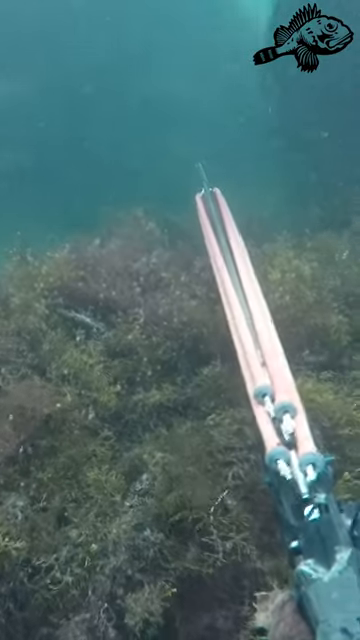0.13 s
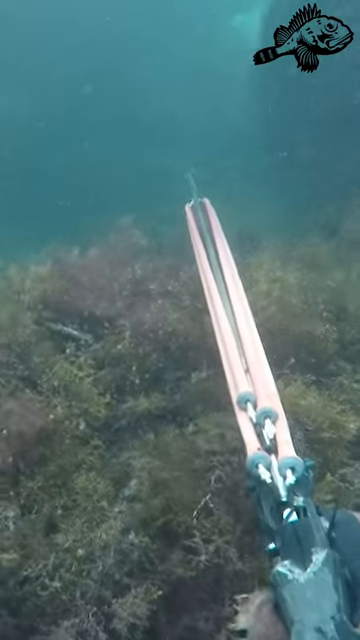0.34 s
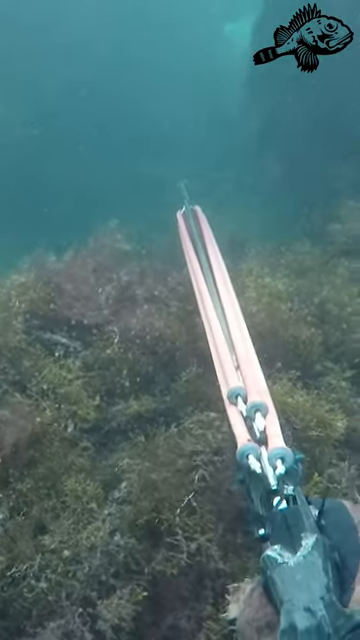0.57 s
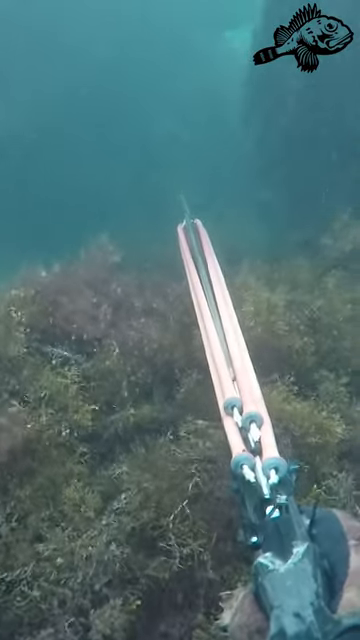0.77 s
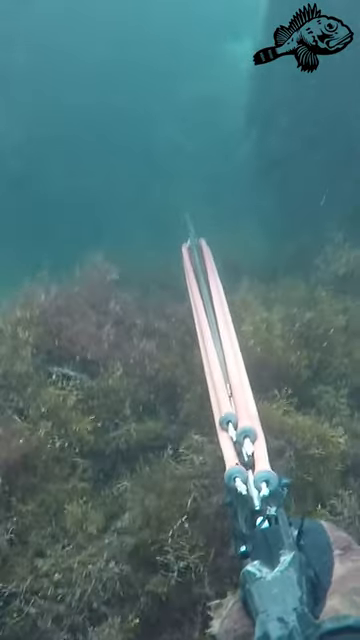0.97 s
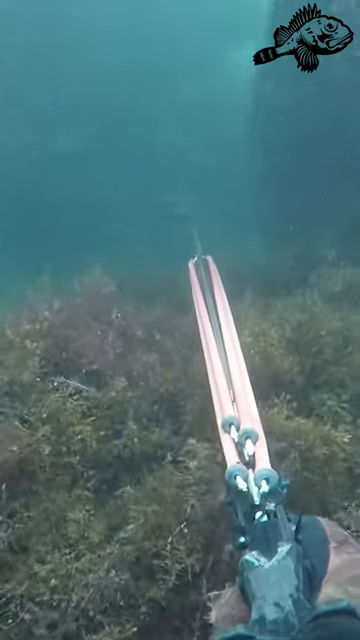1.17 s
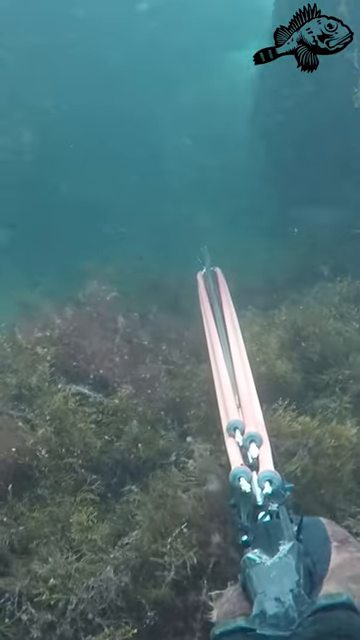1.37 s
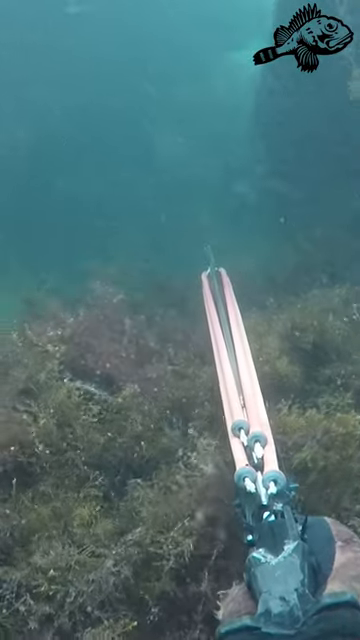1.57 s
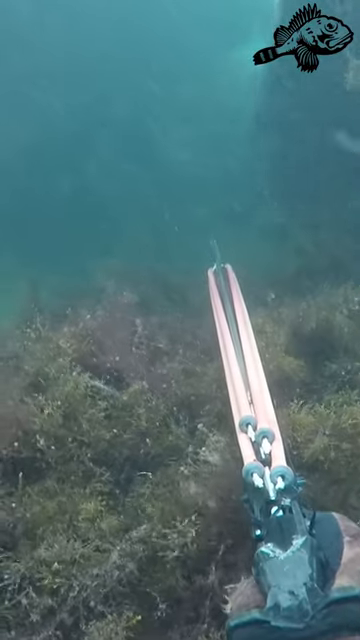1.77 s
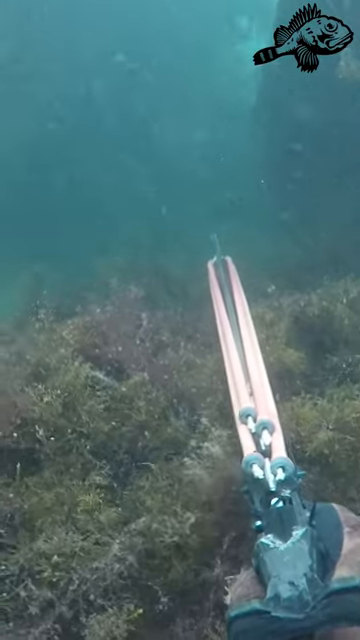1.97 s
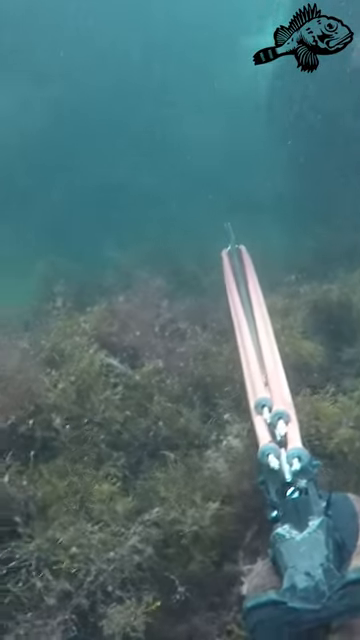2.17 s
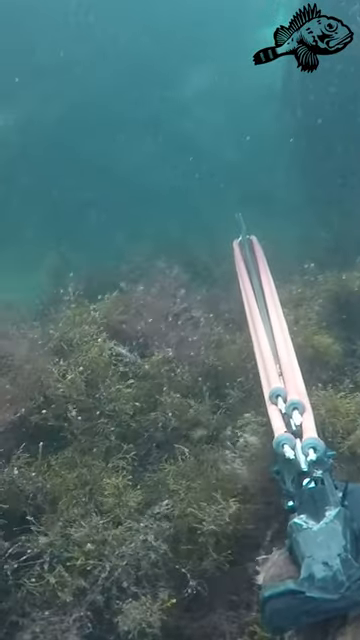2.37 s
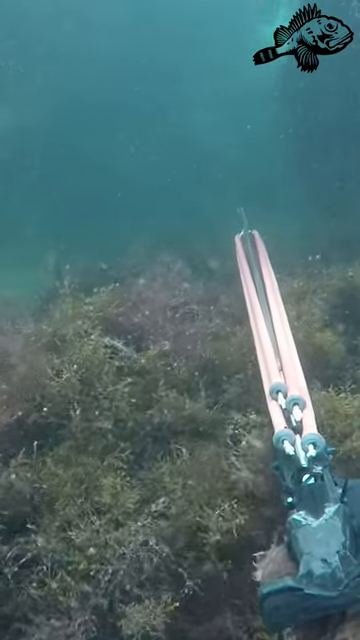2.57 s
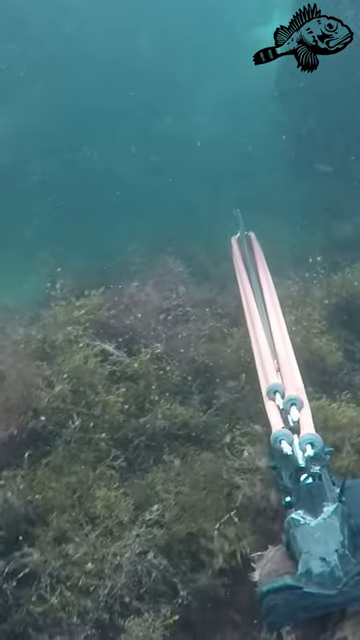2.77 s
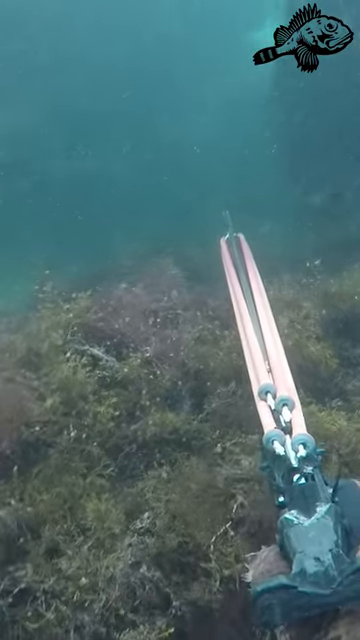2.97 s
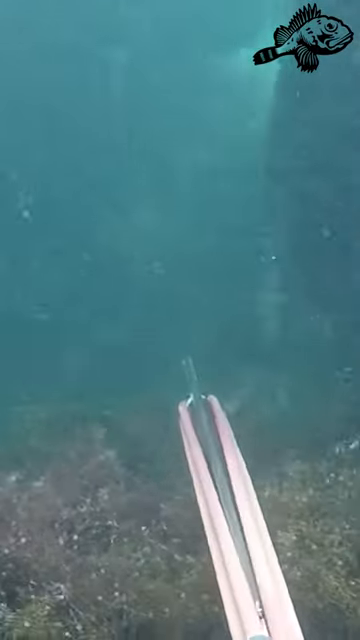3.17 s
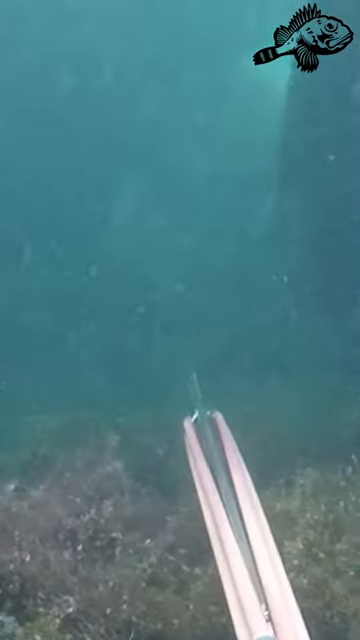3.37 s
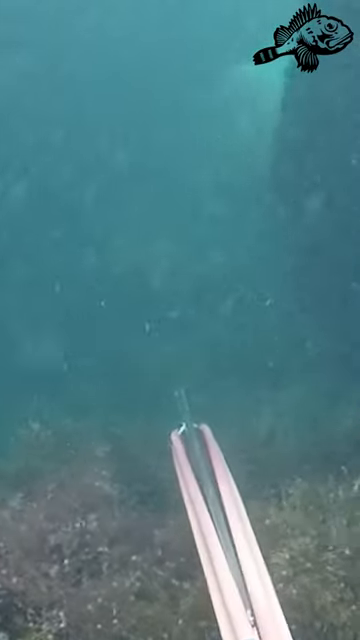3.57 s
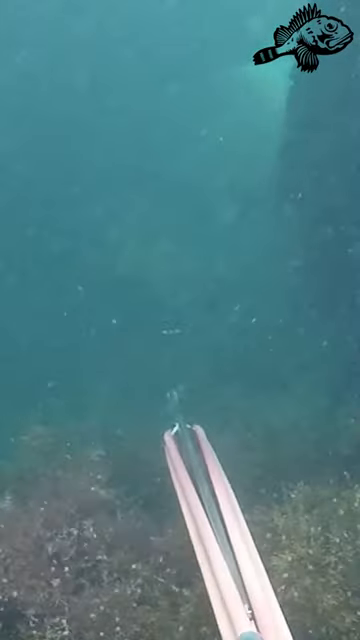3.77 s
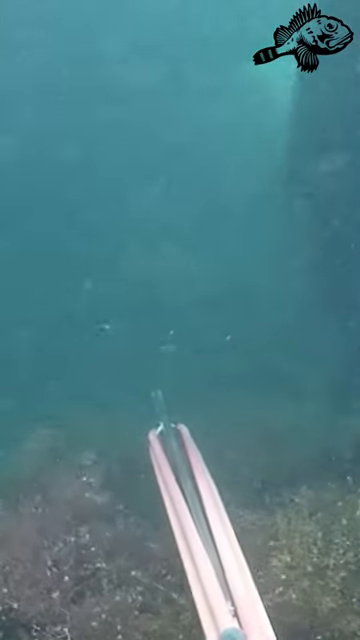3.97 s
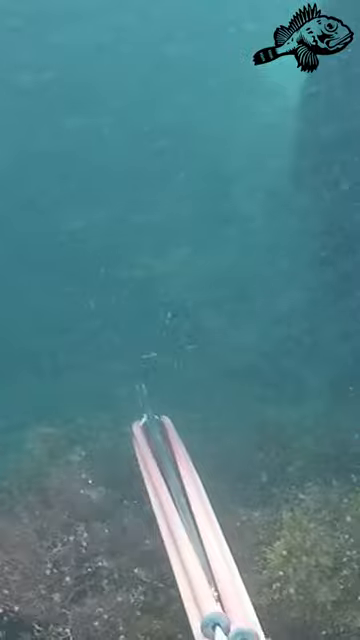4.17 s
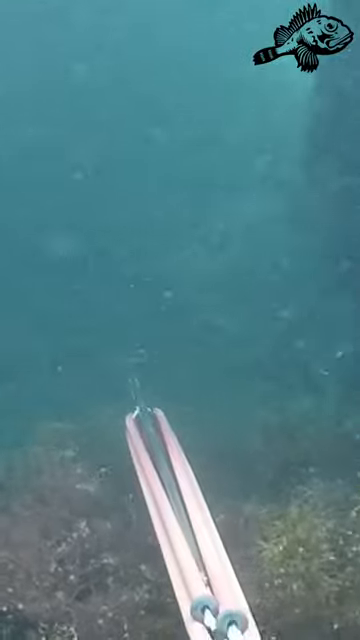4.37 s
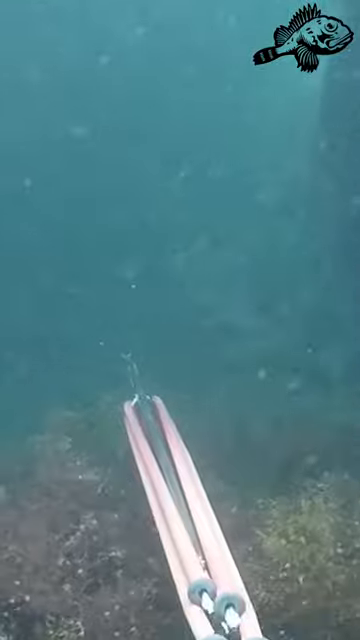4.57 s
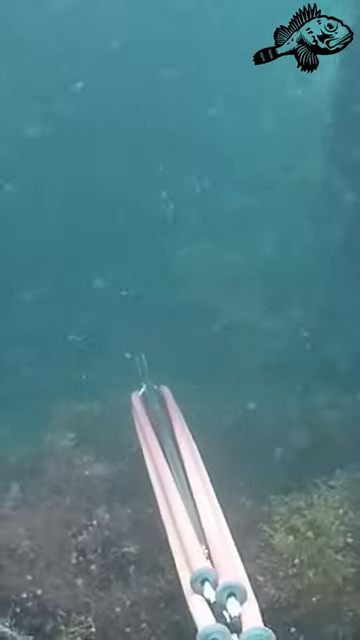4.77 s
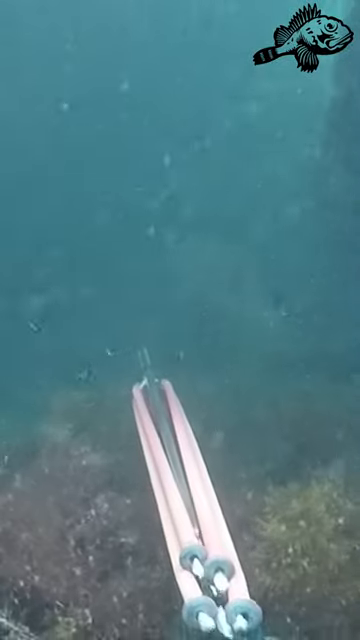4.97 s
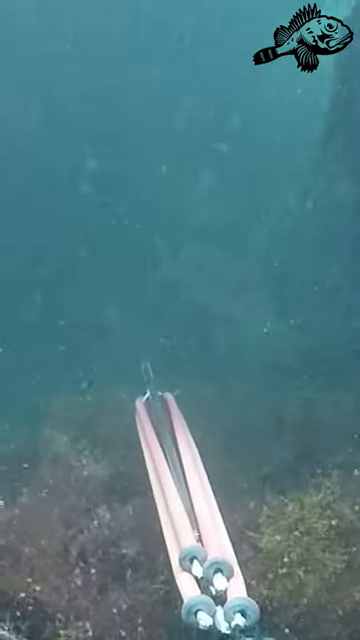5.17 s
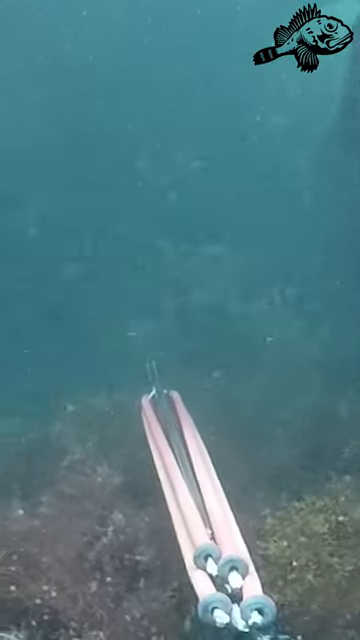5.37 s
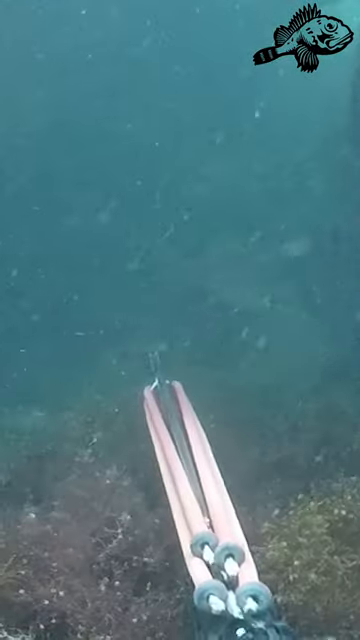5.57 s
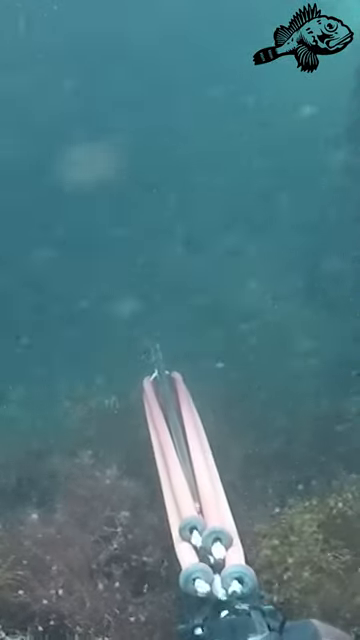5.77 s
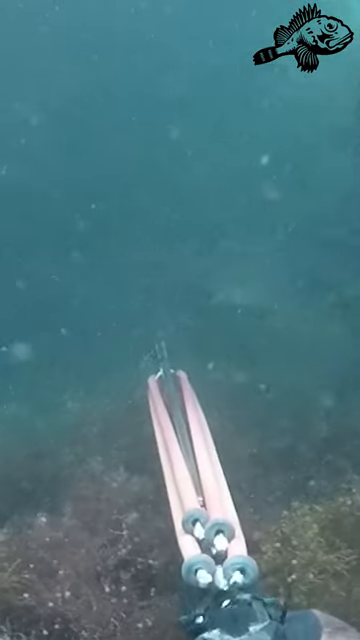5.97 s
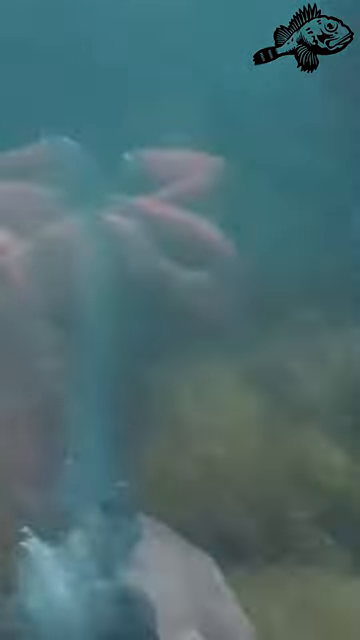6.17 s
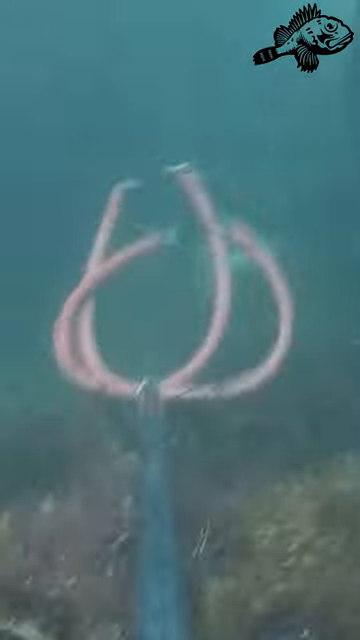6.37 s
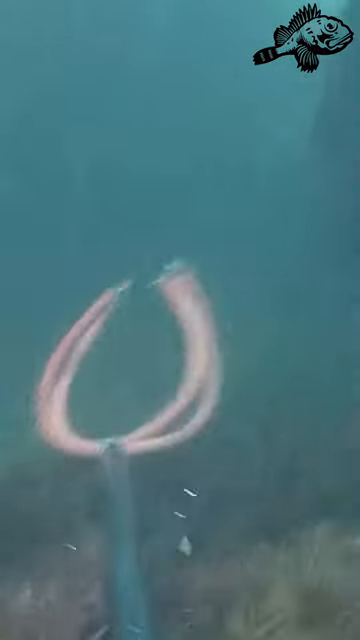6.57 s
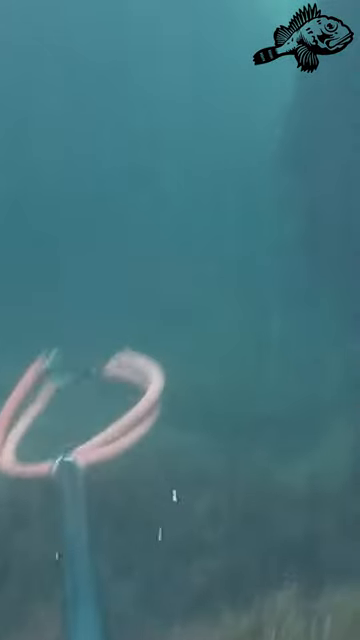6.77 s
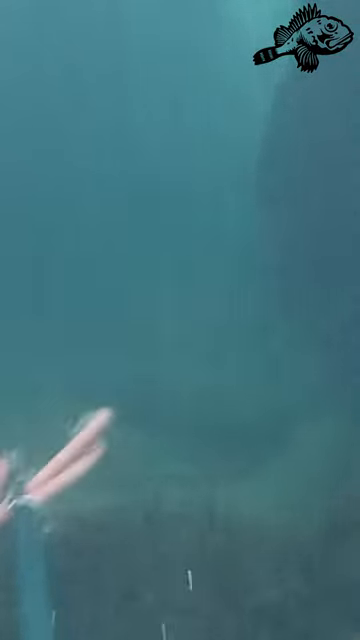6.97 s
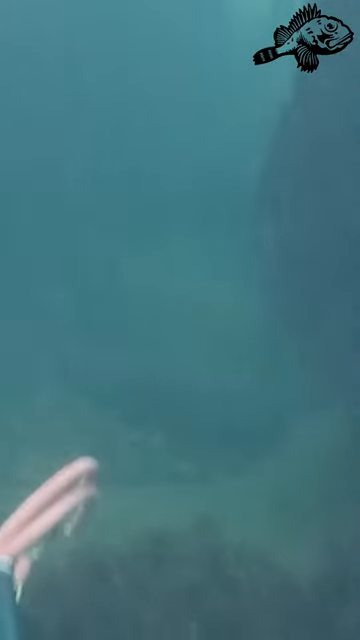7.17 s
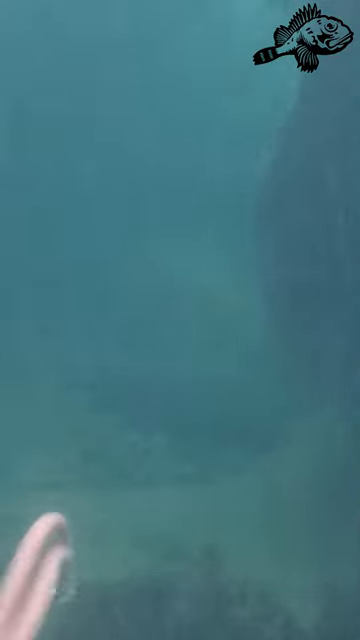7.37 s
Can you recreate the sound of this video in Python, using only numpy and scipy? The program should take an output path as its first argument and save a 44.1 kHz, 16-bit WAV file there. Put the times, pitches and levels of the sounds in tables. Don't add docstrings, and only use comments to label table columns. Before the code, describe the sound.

A diver's housed camera picks up hard, hollow shrimp snaps, some loud and near, others thin or scattered, above frying reef crackle. Slow pressure rumble and soft flutter pass beneath, with dull bumps on the housing. Late on, the speargun lets go with a heavy clattering thump and brief steel ringing. The recording level drops at once, stereo narrows to mono, and only low jolts, faint wash and hiss remain.

```python
import sys
import numpy as np
from scipy import signal
from scipy.fft import rfft, irfft, next_fast_len
from scipy.io import wavfile
from scipy.ndimage import uniform_filter1d

SR = 44100
rng = np.random.default_rng(int(sys.argv[2]) if len(sys.argv) > 2 else 0)


def undo_db(level):
    steps = np.asarray(level, float) / 20
    return 10 ** steps


def log_audio(samples):
    frames = np.atleast_2d(samples).T
    limited = np.clip(frames, -1, 1)
    pcm = np.round(limited * 32767).astype(np.int16)
    wavfile.write(sys.argv[1], SR, pcm)


N = 327649

# t/s, peak level/dB, dull part/dB, fizz part/dB, ring f/Hz
FULL_SNAPS = [(0.129, -10, -18.5, -39.5, 1390), (0.2356, -22.5, -11, -34, 1810),
              (.7327, -14, -22, -34.5, 1650), (0.8114, -26.5, -12, -51, 1730), (0.9471, -23, -9, -45, 1900),
              (1.0808, -14.5, -7, -32, 1500), (1.1876, -8.5, -20.5, -26, 1700),
              (1.5642, -13.5, -8, -43, 1460), (1.6055, -13, -17, -29, 1650), (1.674, -27, -11, -20, 1820),
              (1.7515, -22, -14, -27, 1890), (1.904, -8.5, -29, -30.5, 1400),
              (1.967, -14.5, -23, -25, 1930), (2.1105, -8.5, -29, -33, 1680), (2.7413, -26, 4, -42, 1190),
              (2.7599, -6.5, -21, -30, 1780), (2.8183, -17, -15, -27.5, 1950),
              (3.3423, -5, -24.5, -26.5, 1740), (3.56, -27, -9, -21.5, 2020),
              (3.969, -20.5, -11, -26, 1880), (3.9872, -11, -22, -33, 1730), (4.3625, -18, -6, -23.5, 1150),
              (4.962, -22.5, -14, -26, 1870), (4.5631, -9, -10.5, -42, 1440),
              (5.1031, -8.5, -29, -31.5, 1690), (5.235, -12.5, -45, -14, 2450),
              (5.3668, -15.5, -38, -21.5, 1900), (5.428, -13.5, -11, -35.5, 1220),
              (5.553, -26, -13, -21.5, 2080), (5.96, -25, -9, -26.5, 1900), (.206, -31, 0, -45, 950)]
# t/s, peak level/dB, fizz part/dB, t60/s, ring f/Hz
ECHOING_SNAPS = [(.374, -22, -38, 0.037, 1700), (.619, -25, -40, 0.034, 1960), (.83, -27, -28, 0.07, 2080),
                 (2.0136, -26, -34, 0.062, 1610), (2.0271, -20.5, -18.5, 0.045, 1680),
                 (2.3, -25.5, -22.5, 0.12, 1800), (2.57, -25, -26, 0.074, 1920),
                 (2.658, -26.5, -23.5, 0.07, 1840), (2.873, -29, -25, 0.11, 1470),
                 (3.2757, -21, -32, 0.027, 1830), (3.413, -20, -13.5, 0.019, 1800),
                 (3.751, -32, -22, 0.082, 1630), (4.2695, -27, -20.5, 0.056, 1310),
                 (4.3127, -30, -39, 0.046, 1740), (4.5, -32.5, -29, 0.039, 1720),
                 (4.753, -25, -37, 0.1, 1850), (5.088, -31, -34, 0.059, 1820),
                 (5.145, -30, -27, 0.14, 1670), (5.1909, -25.5, -19.5, 0.042, 2050),
                 (5.478, -21, -31, 0.12, 1890), (1.6125, -18, -33, .03, 1500), (1.618, -20, -36, .04, 1750),
                 (1.626, -24, -36, .05, 1600), (.133, -18, -36, .04, 1300), (3.9655, -24, -30, .04, 1850),
                 (3.978, -24, -34, .06, 1800), (2.733, -33, -30, .02, 2900), (2.775, -21, -30, .05, 1750),
                 (5.373, -26, -20, .06, 2500), (2.824, -25, -32, .08, 1850)]
# t/s, peak level/dB, fizz part/dB, ring f/Hz
THIN_SNAPS = [(0.669, -32.5, -27.5, 2500), (1.203, -27.5, -14, 1700), (1.51, -34.5, -17.5, 1810),
              (2.513, -50, -6, 1700), (2.951, -33, -22, 1360), (3.092, -43.5, -8, 1700),
              (3.305, -40, -9.5, 1800), (4.534, -36.5, -16, 1830), (4.654, -38, -21, 1490),
              (4.771, -34.5, -12.5, 1800), (4.911, -34, -31, 1750), (4.991, -34.5, -15, 1520),
              (5.159, -30, -21, 1700), (5.759, -37, -11.5, 1830), (0.856, -28, -36, 1610),
              (1.160, -28.5, -26, 1700), (3.188, -30, -23, 2600), (3.511, -28, -27, 1490),
              (3.671, -38, -18, 2600), (3.777, -27.5, -25, 1840), (4.07, -31, -22, 1740),
              (4.156, -33.5, -22, 1790), (4.228, -33, -31, 1740), (0.074, -31, -50, 1470),
              (.225, -31, -35, 1400), (.34, -46, -35, 1190), (.494, -39, -17, 1650),
              (.705, -27.5, -34, 1710), (.798, -35, -40, 1320), (1.234, -30, -43, 1330),
              (1.468, -42, -35, 1860), (1.486, -31.5, -30, 1710), (1.795, -31.5, -49, 1230),
              (2.208, -36.5, -37, 1830), (2.887, -25.5, -20.5, 1450), (3.039, -35, -32, 1730),
              (3.284, -33, -35, 1850), (3.336, -29, -26, 1850), (3.39, -39, -27, 2900),
              (3.457, -35, -30, 1610), (3.942, -33, -21, 1480), (5.283, -35, -19, 1180),
              (5.525, -35, -19, 1420), (5.669, -36.5, -22, 1840), (5.744, -32.5, -30, 1870),
              (5.801, -36.5, -41, 1430), (5.868, -38, -35, 1390), (5.912, -35, -35, 1180),
              (1.352, -40, -37, 1170), (3.165, -36, -35, 1270)]


def shrimp():
    t60_s, direct_s_per_db, weed_s_per_db = 0.053, 0.0004, 0.002
    bright = (0.75, 8.8)
    full = []
    for s, db, dull_db, fizz_db, hz in FULL_SNAPS:
        shorter_s = max(direct_s_per_db * (fizz_db + 32), weed_s_per_db * (-32 - fizz_db))
        full.append((s, db, dull_db, fizz_db, t60_s - shorter_s, hz))
    echoing = [(s, db, -25.5, fizz_db, t60, hz) for s, db, fizz_db, t60, hz in ECHOING_SNAPS]
    thin = [(s, db, -25, fizz_db, 0.045, hz) for s, db, fizz_db, hz in THIN_SNAPS]
    out = snaps(full, -12.0, 0.0012, bright, 2.09)
    out += snaps(echoing, -9.5, 0.001, bright, 1.8)
    return out + snaps(thin, -12.5, 0.0014, (0.1, -6.5), 0.72)


def snaps(rows, scatter_db, burst_s, bright, spike):
    size, lead = 4096, 128
    spike_s, gap_s, clump_db = 0.00006, 0.0026, 3.5
    focus_db, focus_width = 12, 0.29
    sag_octaves, sag_spread = 0.06, 0.12
    out = np.zeros((2, N))
    n = np.arange(size)
    t = np.arange(size - lead) / SR
    hz = np.fft.rfftfreq(size, 1 / SR)
    walls = housing(size)

    edges = np.log([660, 820, 950, 1100, 2200, 2450, 3400, 3900, 6000, 7500])
    corners = np.repeat(np.eye(6), [1, 2, 2, 2, 2, 1], 0).T[1:]
    parts = np.array([np.interp(np.log(hz + 1), edges, p) for p in corners])
    fade = np.clip(n / lead, 0, 1) ** 2 * np.clip((size - n) / 600, 0, 1)

    chance = rng.standard_normal((len(rows), 4, size - lead))
    for (s, db, dull_db, fizz_db, t60, ring_hz), (grit, left, right, lumps) in zip(rows, chance):
        smooth = uniform_filter1d(uniform_filter1d(lumps, 70), 70)
        clumps = undo_db(clump_db * evened(smooth)) * np.minimum(t / gap_s, 1)
        decay = undo_db(scatter_db - 60 * t / max(t60, 0.005))
        scatter = (grit + 0.32 * np.array([left, right])) * clumps * decay
        direct = spike * np.exp(-t / spike_s) + 0.37 * grit * np.exp(-t / burst_s)
        direct = np.pad(direct, (lead, 0))
        late = np.pad(scatter * np.clip((0.08 - t) / 0.04, 0, 1), ((0, 0), (lead, 0)))

        rings_hz = ring_hz * np.array([[1], [2 ** (sag_spread * lumps[0] - sag_octaves)]])
        damping = 1j * hz * rings_hz * focus_width
        focus = 1 + undo_db(focus_db) * damping / (rings_hz ** 2 - hz ** 2 + damping)
        spectrum = (rfft(direct) * focus[0] + rfft(late) * focus[1]) * walls
        bands = irfft(spectrum * parts[:, None], size) * fade
        peak = np.sqrt((bands ** 2).mean(1)).max(1)

        top_db = 1.46 * fizz_db + 12.5
        high_db = 24 * max(np.log2(ring_hz / 2100), 0)
        bright_db = bright[0] * min(fizz_db, -19.0) + bright[1] + 1.5 + 0.44 * high_db
        levels_db = db + np.array([dull_db + 6.0, -0.3 - high_db, bright_db, fizz_db + 5.0, top_db])
        add(out, s - lead / SR, np.tensordot(undo_db(levels_db) / peak, bands, 1))
    return out


# f/Hz, width/Hz, left level/dB, right level/dB, left lead/rad, signed gain/1
WALL_MODES = [(405, 286, -9.5, -7.5, 2.5, 0.92), (899, 62, 0, -1.5, -3, -0.74),
              (1171, 128, -7, -1.5, -2.5, 1), (1405, 188, -3, 4, -1.5, -0.51),
              (1646, 205, -30.5, 10.5, -11, 0.23), (1910, 272, -0.5, -0.5, 1.5, -0.6),
              (2197, 426, -10.5, -23.5, 1.47, 0.88), (2320, 310, -28, -22, -6, -0.19),
              (2850, 377, -15, -8, -1.13, -0.97), (3180, 900, -25, -18.5, -1.34, 0.75),
              (4020, 290, -24, -25.5, 1.5, -1.32), (5450, 1200, -25.5, -30.5, 0.2, 0.88),
              (7490, 1300, -32, -28.5, 0.24, -1.25), (10250, 3500, -39.5, -36, 4.5, -0.72)]


def housing(size):
    hz = np.fft.rfftfreq(size, 1 / SR)
    out = np.zeros((2, len(hz)), complex)
    for f, width, left_db, right_db, lead, sign in WALL_MODES:
        mode = sign * 1j * hz * width / (f ** 2 - hz ** 2 + 1j * hz * width)
        out += mode * np.array([[undo_db(left_db) * np.exp(1j * lead)], [undo_db(right_db)]])
    return out


def gun():
    return shudder() + shaft() + clip() + rattle()


# start t/s, length/s, f/Hz, level/dB
JOLTS = [(.221, .04, 150, -19), (6.006, 0.024, 45, -14), (6.012, 0.046, 85, -13),
         (6.014, 0.045, 128.7, -17.5), (6.09, 0.037, 106, -17), (6.143, 0.055, 121, -21),
         (6.228, 0.062, 101, -31), (6.302, 0.046, 115, -21), (6.335, 0.035, 116, -20.5),
         (6.357, 0.045, 110, -15), (6.966, 0.049, 109, -26), (7.165, 0.054, 124, -31),
         (6.505, 0.061, 141, -32.5), (6.598, 0.05, 113.5, -32.5), (6.705, 0.062, 100.6, -31.5),
         (7.238, 0.048, 151, -32), (6.311, 0.014, 390, -48), (6.981, 0.016, 268, -34),
         (6.984, 0.013, 540, -48.5), (7.172, 0.014, 455, -38.5), (7.173, 0.013, 289.5, -35.5),
         (6.935, 0.036, 430, -49.5), (7.262, .03, 451, -48.5), (6.042, .014, 424, -31)]


def shudder():
    skew, sag = 0.61, 0.056
    out = np.zeros((2, N))
    for s, length, hz, db in JOLTS:
        u = np.arange(0, length, 1 / SR) / length
        turn = 2 * np.pi * np.cumsum(hz * (1 + sag * (0.5 - u))) / SR
        onset = np.sin(np.pi / 2 * np.minimum(u / 0.2, 1)) ** 2
        swell = np.sin(np.pi * u ** skew) * onset
        level = np.sqrt(2) * undo_db(db + np.array([[0.6], [-0.6]]))
        add(out, s, level * swell * np.sin(turn))
    return out


# t/s, level/dB
SHAFT_LEVEL = [
    (6.17, -54),
    (6.205, -54),
    (6.26, -67),
    (6.3, -64),
    (6.42, -55.5),
    (6.54, -68.5),
    (6.59, -87),
    (6.655, -70),
    (6.73, -88.5),
]


def shaft():
    return tone(SHAFT_LEVEL, 1902, 0.004, 3)


def tone(rows, hz, wobble, flicker_db):
    db, = curves(rows)
    t = np.arange(N) / SR
    gate = uniform_filter1d(1.0 * (t > rows[0][0]) * (t < rows[-1][0]), 150)
    hz = hz * (1 + wobble * evened(uniform_filter1d(rng.standard_normal(N), 400)))
    flicker = uniform_filter1d(uniform_filter1d(rng.standard_normal(N), 300), 300)
    db = db + flicker_db * evened(flicker)
    return np.sqrt(2) * undo_db(db) * gate * np.sin(2 * np.pi * np.cumsum(hz) / SR)


# f/Hz, level/dB, t60/s
CLIP_MODES = [(3800, -64.5, .25), (5000, -71, .2), (5750, -63.5, 0.23), (6750, -65, .15),
              (7620, -60.5, .18), (11550, -68, .1)]


def clip():
    t = np.arange(12000) / SR
    phase = np.array([[1.2], [0]])
    ring = sum(undo_db(db - 60 * t / t60) * np.sin(2 * np.pi * hz * t + phase) for hz, db, t60 in CLIP_MODES)
    out = np.zeros((2, N))
    add(out, 6.366, undo_db(-2.5) * ring)
    add(out, 6.417, undo_db(-10.5) * ring)
    return out


# t/s, peak level/dB, fizz part/dB, t60/s, ring f/Hz
RATTLES = [(5.990, -38, -19, 0.048, 1500), (6.006, -23, -28, 0.04, 1250), (6.011, -23, -34, .03, 900),
           (6.016, -20, -31, 0.019, 1600), (6.0206, -21, -34, .015, 902), (6.0236, -3.5, -39, 0.008, 1836),
           (6.0268, -3.5, -33, 0.006, 1600), (6.040, -14, -31.5, 0.03, 1550),
           (6.044, -15, -31.5, .025, 1450), (6.049, -12.5, -34.5, 0.025, 1300),
           (6.0537, -10, -41.5, 0.02, 1595), (6.058, -12.5, -38.5, 0.03, 1150),
           (6.063, -19.5, -40, .025, 1250), (6.073, -30, -26, .06, 1400), (6.090, -20, -26.5, 0.025, 900),
           (6.0945, -11.5, -41.5, 0.01, 1200), (6.130, -27, -33, 0.025, 1500),
           (6.1355, -31, -33, .02, 1800), (6.147, -28.5, -32, 0.02, 1000), (6.153, -17.5, -28, 0.05, 1300),
           (6.162, -23, -25, 0.06, 1300), (6.1706, -24, -27, .04, 1400), (6.172, -35.5, -16, 0.06, 2850),
           (6.181, -35, -16.5, .08, 1700), (6.196, -40.5, -23, .06, 1950), (6.21, -46, -30, .06, 1300),
           (6.226, -47, -32, .02, 1700), (6.236, -51, -40, .08, 1500), (6.258, -42, -41.5, 0.03, 1200),
           (6.269, -32.5, -47, 0.07, 1420), (6.365, -41, -18.5, 0.11, 1310),
           (6.416, -45.5, -16, 0.095, 1400), (6.447, -53, -29, .05, 1500), (6.485, -57, -30, .05, 1400),
           (6.516, -51, -35, .04, 950), (6.552, -51, -26, .04, 1800), (6.598, -57, -20, .03, 1800),
           (6.646, -54, -30, 0.1, 1800), (6.68, -57, -31, .08, 1750), (7.268, -57.5, -12, 0.024, 1600)]


def rattle():
    dull_db, dull_db_per_octave = -1.5, -15.5
    rows = [(s, db, dull_db + dull_db_per_octave * np.log2(hz / 1000), fizz_db, t60, hz)
            for s, db, fizz_db, t60, hz in RATTLES]
    return snaps(rows, -12.0, 0.0011, (0.59, -0.8), 0.87)


# t/s, peak level/dB, f/Hz, low shove/dB
FITTING_KNOCKS = [(0.607, -28.5, 314, -15), (1.317, -30.5, 482, -20), (1.63, -24.5, 580, -27),
                  (1.948, -35.5, 480, -14), (2.207, -32, 490, -17), (2.74, -19.5, 416, -6.5),
                  (4.411, -27.5, 465, -9), (4.8023, -21.5, 418, -9), (4.928, -22, 430, -5.5),
                  (5.052, -21.5, 384, -6), (6.023, -19.5, 338, -7), (6.094, -25, 289, -26),
                  (6.153, -24, 350, -9), (6.203, -38.5, 310, -6.5), (6.516, -41, 425, -13)]


def knocks():
    t, out = np.arange(3000) / SR, np.zeros((2, N))
    phase = np.array([[2.1], [0]])
    scrape_band = signal.butter(2, [250, 1100], "band", fs=SR)
    chance = rng.standard_normal((len(FITTING_KNOCKS), 2, 3000))
    for (s, db, hz, shove_db), grit in zip(FITTING_KNOCKS, chance):
        turn = 2 * np.pi * np.cumsum(hz * (0.89 + 1.35 * np.exp(-t / 0.0011))) / SR
        flex_level = undo_db(5.5 - 60 * t / 0.029) * (1 - np.exp(-(t / 0.00086) ** 2))
        flex = flex_level * np.sin(turn + phase)
        upper_level = undo_db(-2 - 60 * t / 0.017) * (1 - np.exp(-(t / 0.00066) ** 2))
        upper = upper_level * np.sin(2 * np.pi * 2.3 * hz * t + phase)
        scrape = evened(signal.lfilter(*scrape_band, grit))
        scrape = scrape * undo_db(-10 - 60 * t / 0.05) * np.minimum(t / 0.003, 1)
        shove_level = undo_db(shove_db + 6.5 - 60 * t / 0.06) * (1 - np.exp(-t / 0.0043))
        shove = shove_level * np.sin(2 * np.pi * 225 * t)
        add(out, s, -undo_db(db) * (flex + upper + undo_db(-1.0) * scrape + shove))
    return out


def flow():
    return surge() + flutter()


# t/s, level/dB
PRESSURE_LUMPS = [(0.0, -16), (0.27, -24), (0.63, -17), (1.14, -19), (1.74, -26.5), (2.29, -27),
                  (2.87, -24.5), (3.32, -24.5), (3.62, -27), (3.91, -20), (4.45, -21), (5.03, -22),
                  (5.28, -25), (5.55, -23), (6.0, -18)]
# f/Hz, level/dB
SURGE_SHAPE = [(12, -4), (20, -6), (32, 16), (44, -3.5), (58, 4), (75, -30.5), (150, -89)]


def surge():
    base_db, duck_db, drop_s, shot_s = -28.5, -13.5, 0.015, 6.004
    t = np.arange(N) / SR
    ducked_db = duck_db * (1 - np.exp(-np.maximum(t - shot_s, 0) / drop_s))
    level = swells(PRESSURE_LUMPS, base_db + 0 * t, 0.05, 0.098) * undo_db(ducked_db + 1.5)
    return level * noise(SURGE_SHAPE, 0.79, 5.3, 0.43)


# t/s, level/dB
EDDIES = [(0, -29.5), (.23, -23.5), (.51, -29.5), (.82, -29), (.96, -23.5), (1.14, -27), (1.34, -37.5),
          (1.73, -38.5), (2.02, -36.5), (2.28, -34), (2.53, -32), (3.0, -31.5), (3.61, -37), (4.43, -32.5),
          (4.81, -28.5), (5.06, -33.5), (5.4, -34.5), (5.56, -29.5), (5.78, -35), (6.8, -44), (7.05, -38),
          (7.3, -41.5)]
# f/Hz, level/dB
FLUTTER_SHAPE = [(45, -39.5), (68, -5), (110, 0), (160, -1.5), (200, -12), (300, -29.5), (600, -39),
                 (1500, -91)]


def flutter():
    t = np.arange(N) / SR
    gusts_db = 2.78 * evened(uniform_filter1d(uniform_filter1d(rng.standard_normal(N), 1500), 1500))
    base_db = -35.5 - 12 * np.exp(-t[::-1] / 0.14)
    level = swells(EDDIES, base_db, 0.048, 0.053) * undo_db(gusts_db - 0.7)
    return level * noise(FLUTTER_SHAPE, 0.92, 3.9, 0.16)


# f/Hz, level/dB
WASH_SHAPE = [(150, -26), (260, 2), (450, -8.5), (650, -22), (1500, -29), (3000, -41.5), (8000, -90.5)]


def late_rush():
    t = np.maximum(np.arange(N) / SR - 6.514, -1)
    wash_db = -49.5 - 28.5 * np.exp(-t / 0.3)
    hiss_db = -90.5 + 24.5 * t * abs(t) + 90 * np.minimum(t, 0)
    return undo_db(wash_db) * noise(WASH_SHAPE, 0.73, even=0.3) + undo_db(hiss_db) * noise(HISS_SHAPE, 1.0)


def reef():
    return undo_db(auto_gain()[0]) * (crackle() + swish())


# f/Hz, level/dB
FAR_SHAPE = [(1500, 0.5), (3000, -6), (4500, -11), (10000, -16)]


def crackle():
    snaps_per_s = 200
    far = undo_db(9.6 * np.minimum(rng.exponential(1, N), 3.4)) * (rng.random(N) < snaps_per_s / SR)
    dying = undo_db(-120 * np.arange(2000) / SR / 0.06)
    power = signal.oaconvolve(far, dying)[:N]
    grain = np.sqrt(abs(power) / power.mean() + 0.5)
    press = grain * (rng.standard_normal(N) + 0.53 * rng.standard_normal((2, N)))
    size = next_fast_len(N)
    rung = irfft(rfft(coloured(press, FAR_SHAPE), size) * housing(size), size)[:, :N]
    return undo_db(-43.0) * evened(patchy(rung, 1.8))


def patchy(x, patchy_db):
    hz, t, z = signal.stft(x, SR, nperseg=256)
    patches = uniform_filter1d(rng.standard_normal(z.shape[1:]), size=3, axis=0)
    patches = uniform_filter1d(patches, size=5, axis=1)
    return signal.istft(z * undo_db(patchy_db * evened(patches)), SR, nperseg=256)[1][:, :N]


# t/s, level/dB
CAMERA_TURNS = [
    (.14, -34),
    (.22, -32),
    (.95, -30.5),
    (1.17, -32.5),
]
# f/Hz, level/dB
SWISH_SHAPE = [(200, -28.5), (300, -12), (450, -5.5), (620, -18), (880, 0.5), (1050, -7.5), (2000, -91)]


def swish():
    level = swells(CAMERA_TURNS, np.full(N, -47), 0.146, 0.065)
    return level * noise(SWISH_SHAPE, 0.91) * [[1], [-0.85]]


# f/Hz, level/dB
HISS_SHAPE = [(600, -30), (2500, -2), (4000, 0), (7500, 0), (10000, -2), (12000, -7), (14300, -15),
              (15500, -50)]


def preamp_hiss(dry, gain_db):
    t = np.arange(N) / SR
    treble = uniform_filter1d(np.diff(dry, prepend=0)[1] ** 2, 200)
    sharp_db = 10 * np.log10(abs(treble) + 1e-12)
    fall_db = t * 120.0
    over_db = np.maximum(np.maximum.accumulate(sharp_db + fall_db) - fall_db + 30.0, 0)
    gate_db = -23 - 16 * np.exp(-(np.maximum(t - 6.22, 0) / 0.12) ** 2)
    level_db = np.maximum(gain_db, gate_db) - 0.8 * over_db - 61.5
    return undo_db(level_db) * ragged(noise(HISS_SHAPE, 0.052, -1.5))


def ragged(x):
    hz, t, z = signal.stft(x, SR, nperseg=2048)
    edge_hz = np.repeat(rng.uniform(11800, 14500, len(t)), rng.integers(1, 5, len(t)))[:len(t)]
    lost = np.clip((hz[:, None] - 10000) / 4000, 0, 0.85)
    lines = np.repeat(rng.random((len(hz), len(t))), 4, axis=0)[:len(hz)] > lost
    kept = z * lines / np.sqrt(1 - lost) * (hz[:, None] < edge_hz)
    return signal.istft(kept, SR, nperseg=2048)[1][:, :N]


# t/s, reef and hiss level/dB, stereo width/dB
RECORDER_GAIN = [(0, 0, 1), (6.02, -1.5, 1.5), (6.1, -1.5, 3.5), (6.19, -7, 2), (6.22, -31, 2),
                 (6.35, -19, 3), (6.45, -22.5, -2.5), (6.7, -24.5, -4.5), (7.0, -38.5, -9),
                 (7.06, -50, -63), (7.43, -56.5, -62.5)]


def auto_gain():
    return curves(RECORDER_GAIN)


# f/Hz, level/dB
MIC_SHAPE = [(100, 0), (9500, 0), (11500, -5), (13000, -13), (14500, -22), (15500, -55), (22000, -80)]


def microphones(dry):
    return coloured(np.clip(dry, -1, 1), MIC_SHAPE)


def evened(x):
    return x / np.sqrt(np.mean(x ** 2) + 1e-20)


def read(points, hz):
    f, value = np.transpose(points)
    return np.interp(np.log(hz + 1), np.log(f + 1), value)


def curves(rows):
    s, *columns = np.transpose(rows)
    return [np.interp(np.arange(N) / SR, s, c) for c in columns]


def add(mix, s, sound):
    part = mix[:, max(round(s * SR), 0):][:, :sound.shape[1]]
    part += sound[:, :part.shape[1]]


def coloured(x, shape):
    size = next_fast_len(N + 2048)
    gain = undo_db(read(shape, np.fft.rfftfreq(size, 1 / SR)))
    return irfft(rfft(x, size) * gain, size)[..., :N]


def noise(shape, same, lean_db=0.0, even=0.0):
    a, b = rng.standard_normal((2, N))
    same = np.clip(same, 0, 1)
    x = coloured([a, same * a + np.sqrt(1 - same ** 2) * b], shape)
    swell = uniform_filter1d(uniform_filter1d(x.mean(0) ** 2, 1800), 1800)
    x = x / (abs(swell) + 0.13 * swell.mean()) ** (even / 2)
    x = x * undo_db(np.array([[lean_db / 2], [-lean_db / 2]]))
    return x / np.sqrt(np.mean(x.mean(0) ** 2))


def swells(rows, base_db, rise_s, fall_s):
    t = np.arange(N)[::64] / SR
    power = undo_db(2 * base_db[::64])
    for s, db in rows:
        power = power + undo_db(2 * db) * np.exp(-((t - s) / np.where(t < s, rise_s, fall_s)) ** 2)
    return np.interp(np.arange(N) / SR, t, np.sqrt(power))


def scene():
    return shrimp() + gun() + knocks() + flow() + late_rush() + reef()


def top_cut(x):
    return signal.sosfilt(signal.butter(12, 15100, fs=SR, output="sos"), x)


def record(dry):
    gain_db, width_db = auto_gain()
    x = microphones(dry) + preamp_hiss(dry, gain_db)
    mid = x.mean(0)
    side = (x[0] - x[1]) / 2 * undo_db(width_db)
    mix = np.clip(np.array([mid + side, mid - side]), -1, 1)
    return top_cut(mix)


dry = scene()
out = record(dry)
log_audio(out)
```